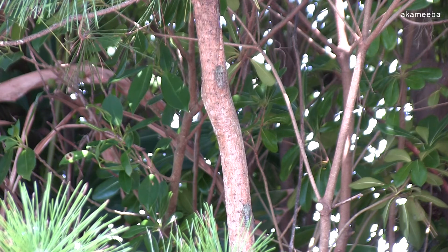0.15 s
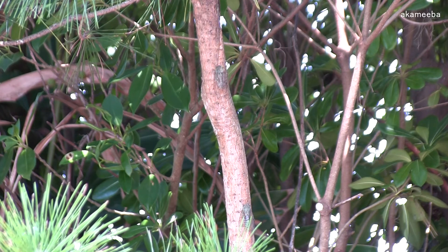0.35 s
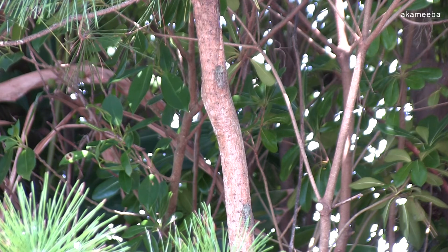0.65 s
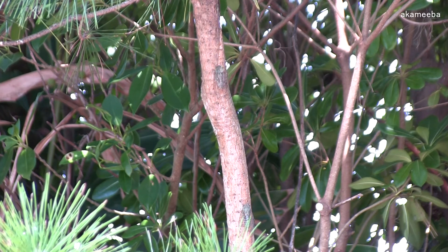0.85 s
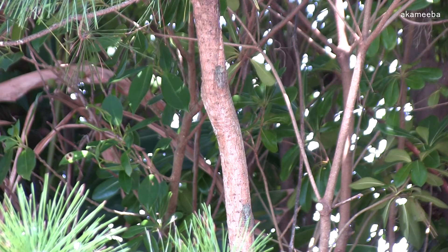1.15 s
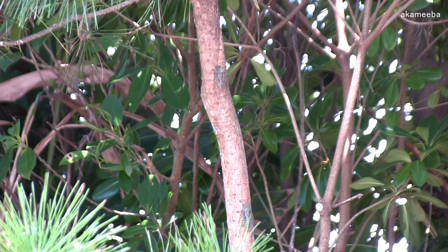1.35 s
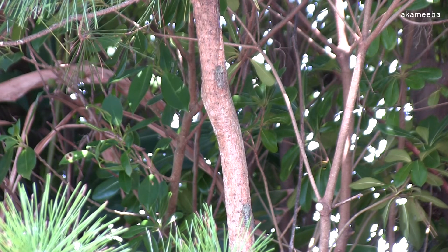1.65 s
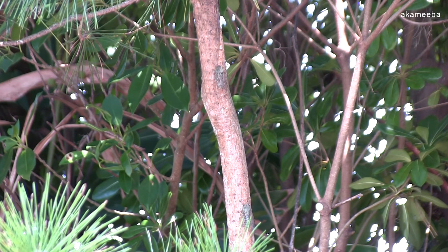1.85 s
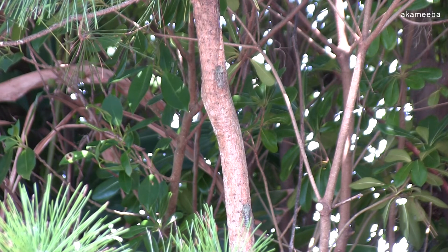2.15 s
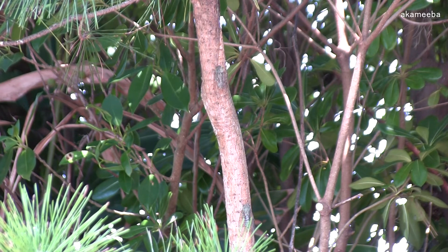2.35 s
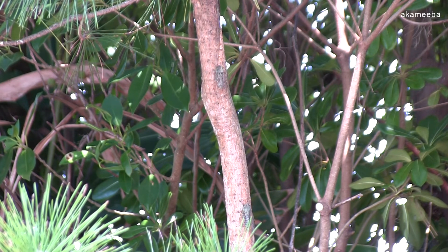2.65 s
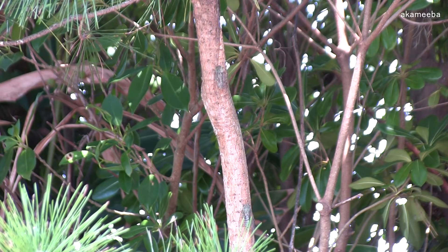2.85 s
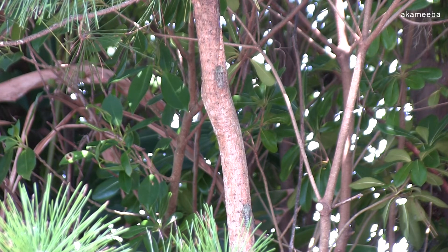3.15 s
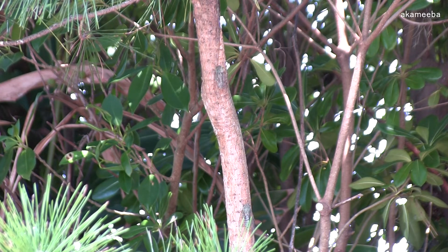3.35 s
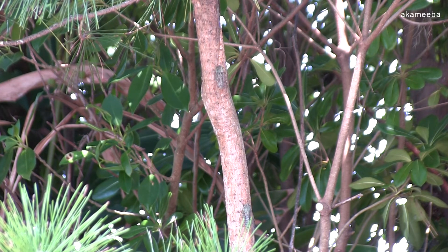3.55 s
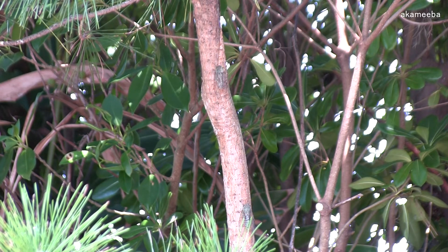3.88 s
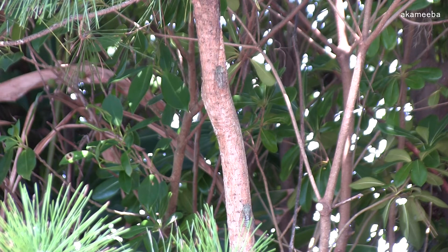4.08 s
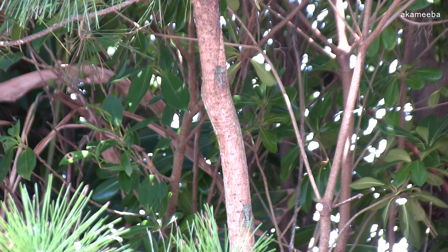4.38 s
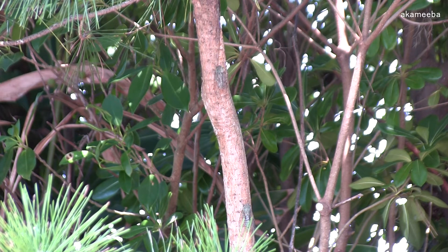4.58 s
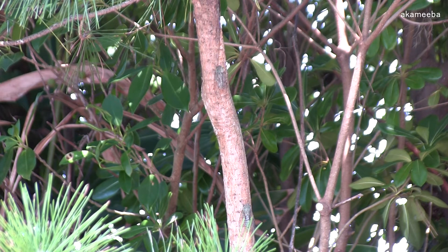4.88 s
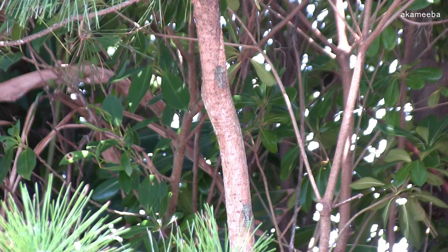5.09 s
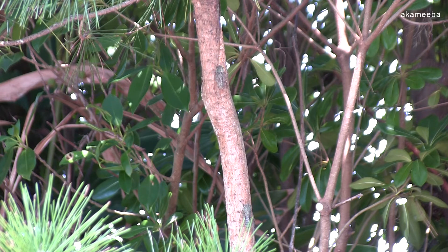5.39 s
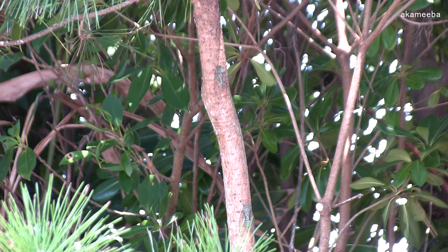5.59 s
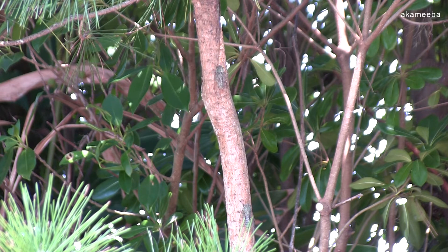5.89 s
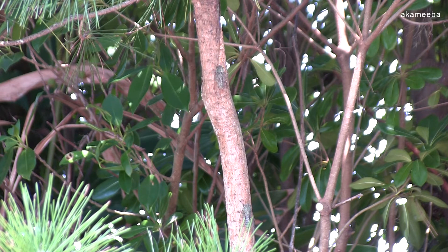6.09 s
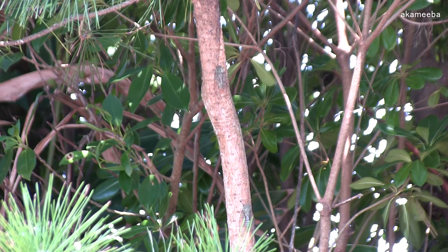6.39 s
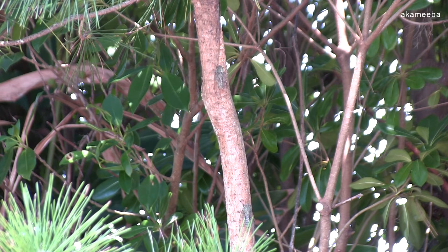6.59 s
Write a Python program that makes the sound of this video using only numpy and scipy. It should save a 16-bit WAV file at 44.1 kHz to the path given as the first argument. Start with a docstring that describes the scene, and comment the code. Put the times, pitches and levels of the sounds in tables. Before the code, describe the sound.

In a leafy thicket, a nearby cicada sings in very fast, crisp chirps. Around two seconds it breaks off amid a shrill rising buzz and a throaty rasp, then restarts stronger. More buzzes cut in before it weakens and stops near the end. A second cicada and a distant chorus continue behind, over low outdoor rumble, faint engine throb and soft leaf stirs. Close stereo outdoor pickup, singers slightly to the right.

```python
"""A thicket with cicadas. A near one sings in quick chirps of about four tymbal pulses, breaks off,
starts again and at last falls silent; shrill buzzes and harsh rasps cut in. Each pulse is a burst of
rib clicks, coloured by the body and scattered by trunks and leaves as sparse echoes. A neighbour and
a far chorus go on behind. Filtered noise makes the low outdoor rumble and the stirring leaves; a
repeated noise cycle and low sines make the faint throb and hum of a far engine."""
import sys
import numpy as np
from scipy import signal
from scipy.fft import rfft, irfft, next_fast_len
from scipy.io import wavfile

SR = 44100
rng = np.random.default_rng(int(sys.argv[2]) if len(sys.argv) > 2 else 0)


def wrap_up_sound(samples):
    """Save the sound to the file named by the first command line argument, as 16-bit audio."""
    columns = np.atleast_2d(samples).T
    # keep every value between -1 and 1, then stretch to whole-number steps
    tamed = np.clip(columns, -1, 1)
    steps = np.round(tamed * 32767).astype(np.int16)
    wavfile.write(sys.argv[1], SR, steps)


N = 296793
TIME = np.arange(N) / SR  # s

# body ring of the neighbour and the chorus singers, relative: f/Hz, level/dB
FAR_BODY = [(1400, -54), (1850, -11), (2330, -3), (2650, -6), (2950, 2.5), (3500, -4), (4500, -1),
            (6300, -5.5), (7400, 3.5), (8500, -3.5), (9500, -1.5), (11000, -10), (12800, -19), (14800, -17)]


def gain_of(db):
    """Decibels to amplitude."""
    return 10 ** (np.asarray(db) / 20)


def evened(x):
    """Scales to rms 1."""
    return x / np.sqrt(np.mean(x ** 2) + 1e-20)


def along(curve, s):
    """Value of a (t/s, value) curve at the times s, linear between rows."""
    return np.interp(s, *np.transpose(curve))


def coloured(x, points):
    """Minimum-phase filter with the gain of a (f/Hz, level/dB) table, interpolated over log f."""
    size = next_fast_len(2 * N)
    hz, db = np.transpose(points)
    bin_hz = abs(np.fft.fftfreq(size, 1 / SR))
    bin_db = np.interp(np.log(bin_hz + 1), np.log(hz + 1), db)
    log_gain = np.log(gain_of(bin_db))
    response = np.exp(np.conj(signal.hilbert(log_gain)))  # phase from the log gain
    return irfft(rfft(x, size) * response[:size // 2 + 1], size)[:N]


def drift(cutoff_hz):
    """Slow random wander of rms 1: noise below cutoff_hz."""
    spectrum = rfft(rng.standard_normal(N))
    return evened(irfft(spectrum * (np.fft.rfftfreq(N, 1 / SR) < cutoff_hz), N))


def stereo(mid, side):
    """Left and right from mid and side."""
    return np.array([mid + side, mid - side])


def tymbal(s, db, rib_hz, speed_up, uneven, fade_db, count):
    """In each pulse the ribs buckle in turn, ever faster; their rate makes the bands of the song."""
    rib = np.arange(count)
    chance = rng.standard_normal((len(s), 3, count))
    rate_hz = rib_hz * (1 + speed_up * (rib / (count - 1) - .5))
    # one random share per rib, one per pulse
    gaps_s = (1 + uneven * chance[:, 0] + uneven * chance[:, 2, :1]) / rate_hz
    at_s = s[:, None] + np.cumsum(gaps_s, 1) - count / 2 / rib_hz
    arch = np.sin(np.pi * (rib + 1) / (count + 1))
    force = arch * gain_of(db[:, None] - fade_db * rib + 2 * chance[:, 1])
    fine = 4  # oversampling of the click times
    inside = (at_s > 0) & (at_s < N / SR)
    clicks = np.bincount((at_s[inside] * SR * fine).astype(int), force[inside], N * fine)
    return signal.resample_poly(clicks, 1, fine)[:N]


def chirps(starts_s, pulses, pulses_per_s, jitter_s, vary_db):
    """Times and levels of the pulses: each chirp is a short, slightly uneven volley."""
    uneven_chirps = .07  # spread of the pulse rate from chirp to chirp, share
    pace = pulses_per_s * np.exp(uneven_chirps * rng.standard_normal(len(starts_s)))
    volleys = [start + np.arange(round(n)) / rate for start, n, rate in np.broadcast(starts_s, pulses, pace)]
    at_s = np.concatenate(volleys)
    late, strong = rng.standard_normal((len(at_s), 2)).T
    return at_s + jitter_s * late, vary_db * strong


def body_delay(x, hz, width_hz):
    """The body holds back the sound near a resonance, so each click rings on briefly (an all-pass)."""
    radius = np.exp(-np.pi * width_hz / SR)
    poles = [1, -2 * radius * np.cos(2 * np.pi * hz / SR), radius * radius]
    return signal.lfilter(poles[::-1], poles, x)


def thicket(x, wet_db, t60_s):
    """Direct sound plus sparse decaying echoes off trunks and leaves; rms 1."""
    # colour of the scattered side signal: f/Hz, side to mid/dB
    scatter_width = [(1000, -23), (2400, -9.5), (4600, -11), (7000, -13), (10000, -68), (14000, -45)]
    t = TIME[:SR // 2]
    shape = (2, len(t))
    # 3500 echoes per s of either sign, none in the first 0.4 ms
    taps = rng.choice([-1., 1.], shape) * (rng.random(shape) < 3500 / SR) * (t > .0004)
    taps = taps * np.exp(-np.log(1000) * t / t60_s)
    taps = taps / np.linalg.norm(taps[0])
    mid, side = gain_of(wet_db) * signal.fftconvolve(x[None], taps, axes=1)[:, :N]
    return evened(stereo(x + mid, coloured(side, scatter_width)))


def phrase(start_s, end_s):
    """Start times of the near singer's chirps, one for each beat of its tempo."""
    # steady, but hurried around the break: t/s, chirps/(1/s)
    tempo = [(1.5, 23.79), (1.7, 22.9), (1.85, 24.9), (2.66, 26.6), (3.0, 26.6), (3.1, 23.8), (5.0, 23.8),
             (5.15, 24.4)]
    t = np.arange(start_s, end_s, 1 / SR)
    beats = np.cumsum(along(tempo, t)) / SR
    return np.interp(np.arange(beats[-1]), beats, t)


def near_cicada():
    """Crisp pulses from a branch close by, in a sizzle of their own treble scattered by the needles."""
    # the two phrases: start/s, end/s
    phrases = [(.001, 2.2), (2.661, 5.77)]
    # effort: pulses crowd together around the break, then slacken: t/s, pulses/(1/s)
    effort = [(0, 169), (1.1, 144), (1.45, 122), (2.05, 120), (2.2, 200), (2.8, 290), (3.15, 230),
              (3.75, 185), (4.0, 142), (4.7, 145), (5.7, 110)]
    # under strain the chirps run on: t/s, pulses per chirp
    chirp_pulses = [(2.0, 4), (2.17, 7), (2.7, 7), (2.83, 4), (2.96, 4), (3.02, 8), (3.14, 4)]
    # body ring under each rib click, relative: f/Hz, level/dB
    near_body = [(1300, -53.5), (1750, -14), (2050, -6.5), (2320, -2.5), (2650, -2.5), (3500, 0), (4100, 3),
                 (4600, 3.5), (5900, 1.5), (6950, 4), (8400, 3.5), (9300, -1.5), (11000, -6.5),
                 (15000, -18)]
    # treble thrown about by the needles, relative: f/Hz, level/dB
    sizzle_colour = [(2000, -28), (4400, -15), (6000, -43), (7500, 21), (10000, -24), (12500, -6),
                     (15000, 17)]
    fresh_db, fresh_s = 2, 0.93  # fresh strength after the break, and its decay time
    tires_at_s, fade_db_per_s = 5.17, 6.5
    fresh_rib_hz, rib_rise_hz_per_s = 2332, 190  # ribs click faster as it tires

    starts_s = np.concatenate([phrase(*row) for row in phrases])
    pulses, pulses_per_s = along(chirp_pulses, starts_s), along(effort, starts_s)
    s, db = chirps(starts_s, pulses, pulses_per_s, jitter_s=0.000501, vary_db=0.07)
    since_break_s = s - phrases[1][0]
    db = db + fresh_db * (since_break_s > -1 / SR) * np.exp(-abs(since_break_s) / fresh_s)
    tired_s = np.maximum(s - tires_at_s, 0)
    db = db - fade_db_per_s * tired_s
    rib_hz = fresh_rib_hz + rib_rise_hz_per_s * tired_s[:, None]
    clicks = tymbal(s, db, rib_hz, speed_up=.1, uneven=.022, fade_db=1.1, count=6)

    song = body_delay(coloured(clicks, near_body), hz=4560, width_hz=1650)
    song = body_delay(song, hz=11500, width_hz=1200)
    song = body_delay(song, hz=14500, width_hz=800)
    sizzle = thicket(coloured(clicks, sizzle_colour), wet_db=42, t60_s=0.17)
    return gain_of(-37.0) * thicket(song, wet_db=-3.5, t60_s=0.054) + gain_of(-48.5) * sizzle


def buzz(rows, body):
    """Pulses run together, each sweeping upward through more ribs than in a chirp."""
    sag, slide_s = .12, 0.036  # ribs start slow by this share and slide up to pitch
    fall_s = 0.022
    times, levels, pitches = [], [], []
    for start, end, first, last, rise, db in rows:
        count = round((end - start) * (first + last) / 2)
        s = start + np.cumsum(1 / np.linspace(first, last, count))
        swell = np.clip(np.minimum((s - start) / rise, (end - s) / fall_s), .01, 1)
        times.append(s + .00007 * rng.standard_normal(len(s)))  # slightly uneven, hence harsh
        levels.append(db + 20 * np.log10(swell))
        pitches.append(2457 * (1 - sag * np.exp(-(s[:, None] - start) / slide_s)))
    clicks = tymbal(np.concatenate(times), np.concatenate(levels), np.concatenate(pitches),
                    speed_up=0.548, uneven=0.011, fade_db=1.8, count=9)
    ringing = body_delay(coloured(clicks, body), hz=4230, width_hz=1200)
    return thicket(ringing, wet_db=-3.5, t60_s=0.041)


def rasps():
    """Throaty rasps, and the shrill buzzes that lead into them or come alone: two body colours."""
    # calls, relative level: start/s, end/s, first pulses/(1/s), last pulses/(1/s), rise/s, level/dB
    rasp_calls = [(2.215, 2.478, 240, 211, 0.027, -5.5), (3.31, 3.62, 216, 172, 0.046, -13)]
    shrill_calls = [(0, .26, 340, 210, 0.0049, -11.5), (2.07, 2.24, 190, 285, 0.07, -4.5),
                    (2.615, 2.665, 215, 250, 0.023, -3.5), (2.9, 3.33, 200, 216, 0.096, -10),
                    (4.02, 4.4, 180, 210, 0.062, -10)]
    # body ring, relative: f/Hz, level/dB
    rasp_body = [(1200, -58), (1650, -16), (2200, -4), (2600, -6), (3080, 5.5), (3500, -1), (4050, 6.5),
                 (4600, 0), (5300, -1.5), (6400, 1.5), (7000, -22), (10000, -10), (12000, -24),
                 (15000, -28)]
    shrill_body = [(1400, -44), (2000, -36), (2550, -7), (2980, 0), (3400, -3.5), (4600, -21), (6000, -4.5),
                   (7000, -2.5), (8300, -1), (9600, -3.5), (11200, -8.5), (12400, -11), (14000, -19),
                   (15500, -20)]
    throaty = gain_of(-44.0) * buzz(rasp_calls, rasp_body)
    shrill = gain_of(-47.5) * buzz(shrill_calls, shrill_body)
    return throaty + shrill


def neighbour():
    """A second singer deeper in the leaves at one even pace, its pulses blurred by strong echoes."""
    start_s, chirps_per_s, pulses_per_s = .003, 22.8, 205
    starts_s = np.arange(start_s, N / SR, 1 / chirps_per_s)
    s, db = chirps(starts_s, 6, pulses_per_s, jitter_s=.0008, vary_db=0.7)
    clicks = tymbal(s, db, rib_hz=2440, speed_up=0.093, uneven=0.044, fade_db=5.5, count=5)
    return gain_of(-43.5) * thicket(coloured(clicks, FAR_BODY), wet_db=9, t60_s=.04)


def chorus(count=5):
    """Distant singers, each at its own pace, merge into a sizzle."""
    # swell of the chorus: t/s, level/dB
    chorus_level = [(0, -39), (.8, -40), (2, -39.5), (2.55, -39.5), (3.1, -39), (3.7, -41.5), (4.25, -36.5),
                    (4.7, -43), (5.3, -40), (5.9, -41.5), (6.73, -40.5)]
    clicks = np.zeros(N)
    for pace, pitch, start in rng.uniform(-1, 1, (count, 3)):
        chirps_per_s = 23 + 2 * pace
        starts_s = np.arange((start - 1) / chirps_per_s, N / SR, 1 / chirps_per_s)
        s, db = chirps(starts_s, 5, 143, jitter_s=.00096, vary_db=3.5)
        clicks += tymbal(s, db, rib_hz=2370 + 50 * pitch, speed_up=0.14, uneven=0.047,
                         fade_db=-0.9, count=5)
    scattered = thicket(coloured(clicks, FAR_BODY), wet_db=12, t60_s=.25)
    return gain_of(along(chorus_level, TIME)) * scattered


def rumble_and_throb():
    """Low outdoor noise with a far engine in it; the engine's repeated cycle gives a comb of lines."""
    # noise colour, relative: f/Hz, level/dB
    rumble_colour = [(18, -61), (38, -34.5), (46, -0.5), (90, -4.5), (130, -4.5), (215, -8), (295, -12),
                     (410, -18.5), (730, -18.5), (920, -21.5), (1600, -23), (2100, -19.5), (3500, -91)]
    # f/Hz, side to mid/dB
    rumble_width = [(60, -22), (110, -18.5), (200, -14.5), (380, -5.5), (700, -2.5), (1290, -0.5),
                    (2380, -12), (4400, -10), (8120, -16), (15000, -38)]
    # slow level change: t/s, level/dB
    rumble_swell = [(0, 0.5), (4.7, -1), (6, -3)]
    mid, side = rng.standard_normal((2, N))
    cycle = rng.standard_normal(round(SR / 11.27))  # uneven engine cycle, 11.27 per s
    throb = coloured(np.resize(cycle, N), [(200, 1), (500, -12.0)])
    mid = coloured(mid + throb, rumble_colour)
    side = coloured(coloured(side, rumble_width), rumble_colour)
    return gain_of(-52 + along(rumble_swell, TIME)) * evened(stereo(mid, side))


def engine_hum():
    """Low sine lines of the far engine, each wandering by 0.4 Hz rms."""
    # f/Hz, rms level/dB
    hum_lines = [(45.1, -63.5), (90.2, -60), (210, -69.5), (293, -72.5)]
    hum = np.zeros(N)
    for hz, db in hum_lines:
        phase = 2 * np.pi * np.cumsum(hz + .4 * drift(4.3)) / SR
        hum += gain_of(db) * evened(np.sin(phase))
    return hum


def leaf_stirs():
    """Soft stirrings of air in the leaves: coloured noise under bell-shaped swells."""
    # centre/s, length/s, level/dB
    stir_events = [(0.125, 0.11, -55), (.33, 0.17, -59.5), (0.477, .12, -57.5), (.66, 0.17, -54.5),
                   (2.01, 0.086, -56.5), (2.221, 0.22, -57.5), (4.4, 0.86, -62.5)]
    # noise colour, relative: f/Hz, level/dB
    stir_colour = [(80, -23), (170, -1.5), (320, 5.5), (500, -5), (1250, -7.5), (2000, -21.5), (4000, -46)]
    swell = sum(gain_of(db) * np.exp(-(2 * (TIME - s) / length) ** 2) for s, length, db in stir_events)
    mid, side = rng.standard_normal((2, N))
    return swell * evened(stereo(coloured(mid, stir_colour), 0.53 * coloured(side, stir_colour)))


def scene():
    """Sums the sources; the singers sit a little to the right, the stirring leaves to the left."""
    # f/Hz, left minus right/dB
    balance = [(100, -1), (250, 0), (550, 3), (1200, .2), (2400, -.7), (4600, -1.3), (7000, -.9),
               (8200, -.1), (10000, 0)]
    singers = near_cicada() + rasps() + neighbour() + chorus()
    both = singers + rumble_and_throb() + engine_hum() + leaf_stirs()
    left = coloured(both[0], [(hz, db / 2) for hz, db in balance])
    right = coloured(both[1], [(hz, -db / 2) for hz, db in balance])
    return np.array([left, right])


def record(dry):
    """The recorder's band limit: a linear-phase low-pass."""
    edge_hz = 15700
    lowpass = signal.firwin(511, edge_hz, window=("kaiser", 9), fs=SR)
    return signal.oaconvolve(dry, lowpass[None], "same")


dry = scene()
out = record(dry)
wrap_up_sound(out)
```